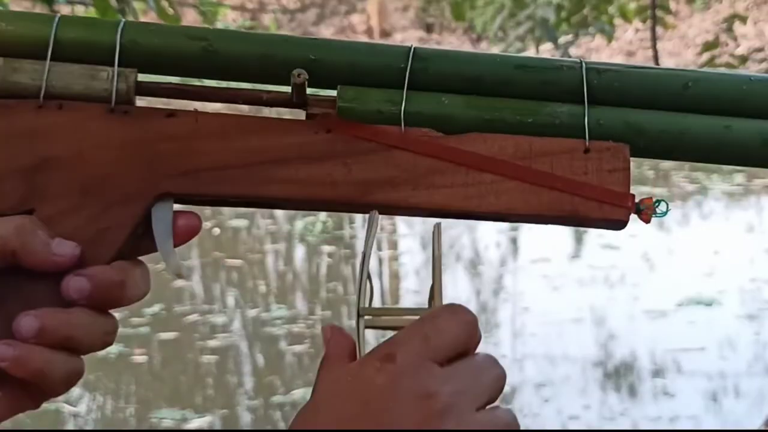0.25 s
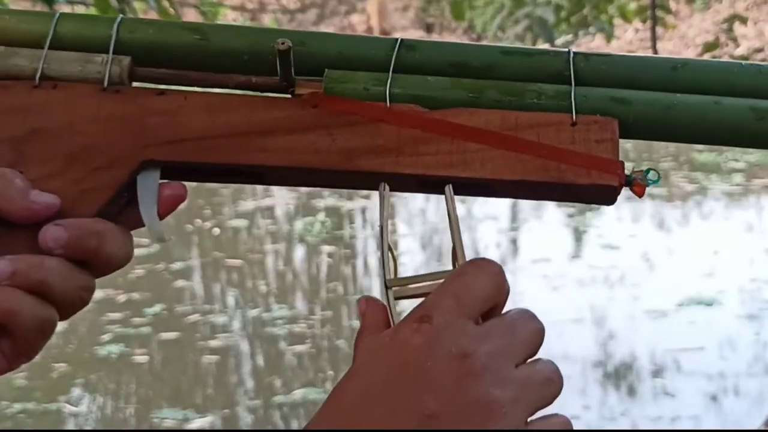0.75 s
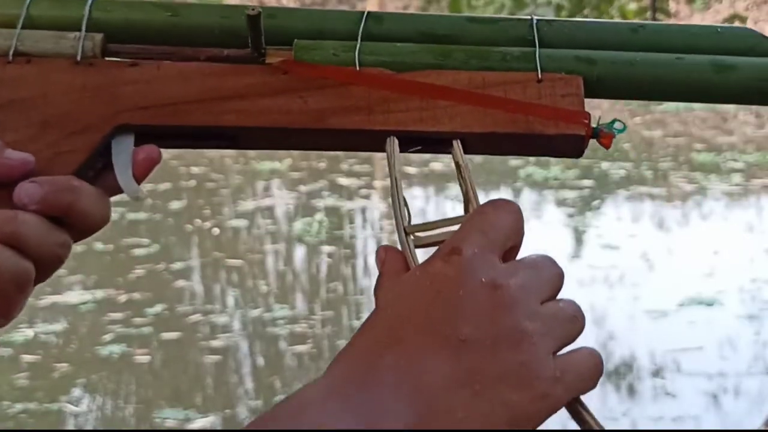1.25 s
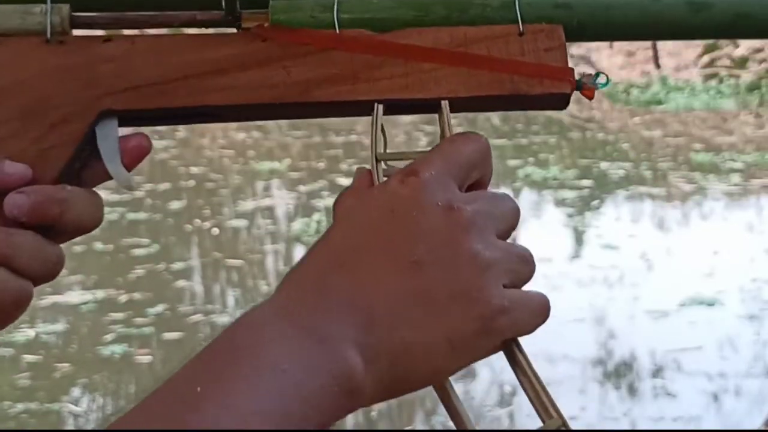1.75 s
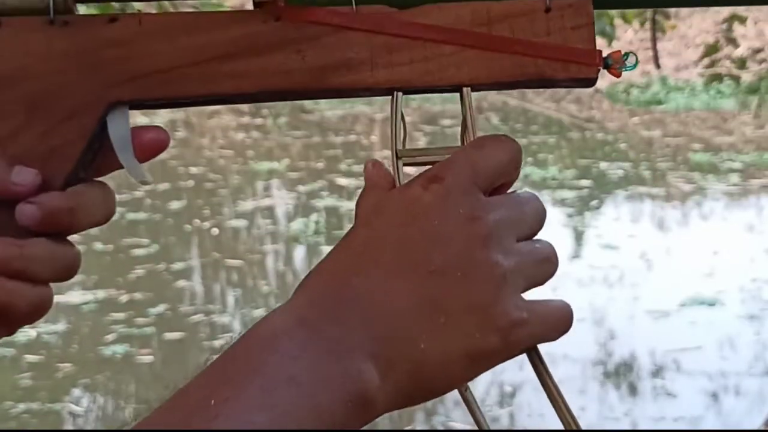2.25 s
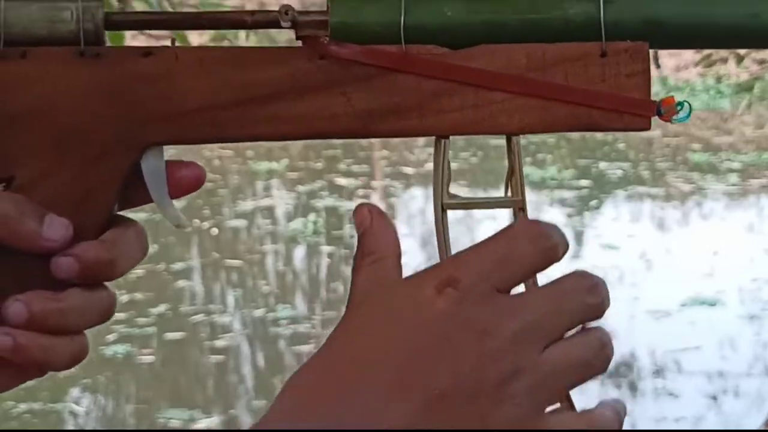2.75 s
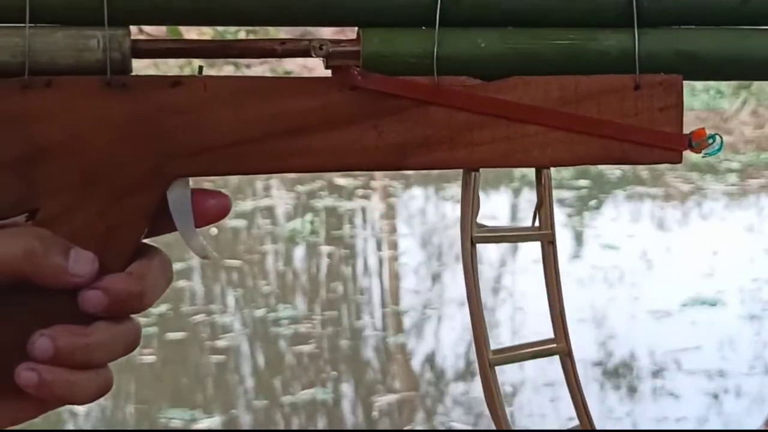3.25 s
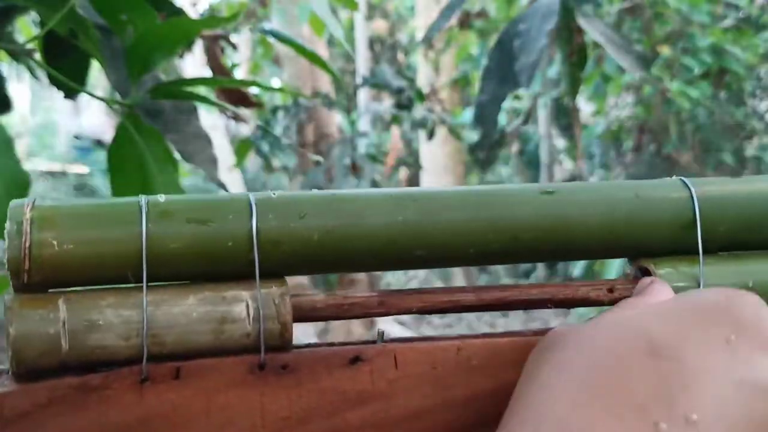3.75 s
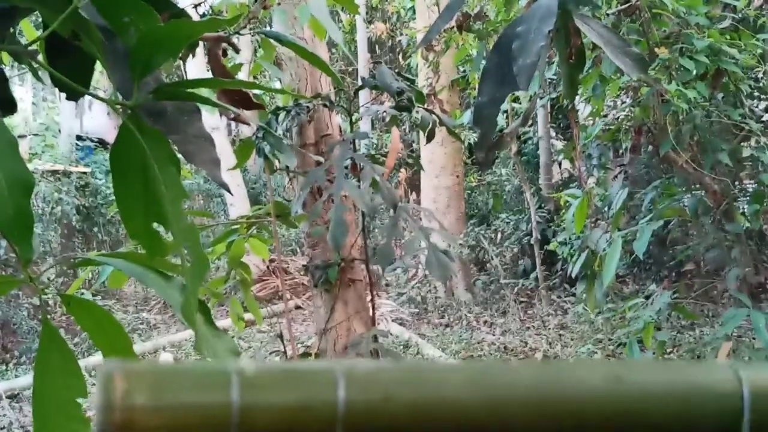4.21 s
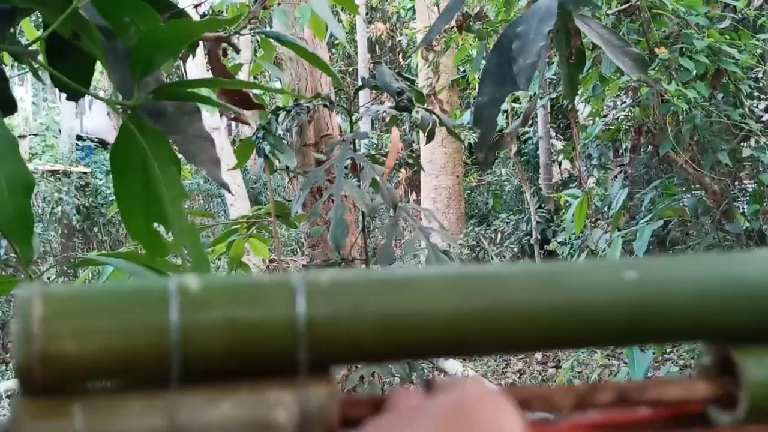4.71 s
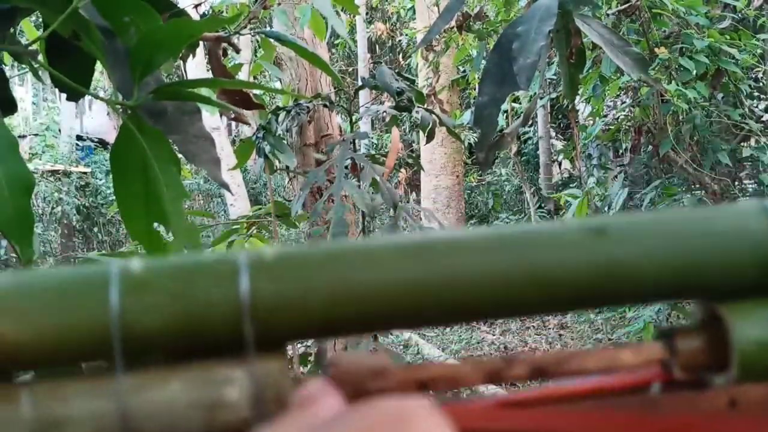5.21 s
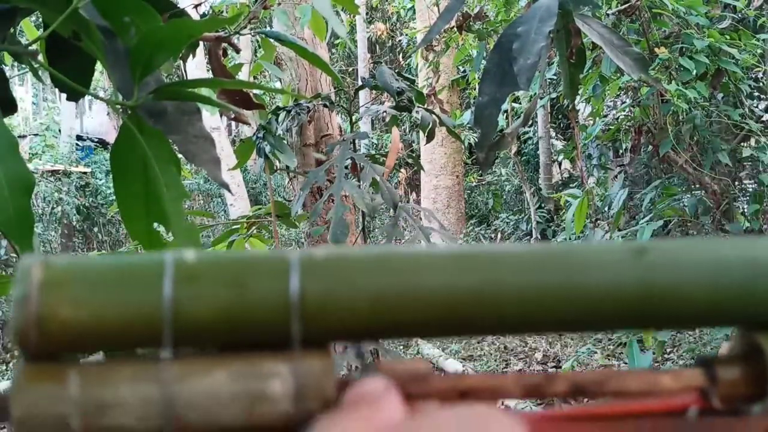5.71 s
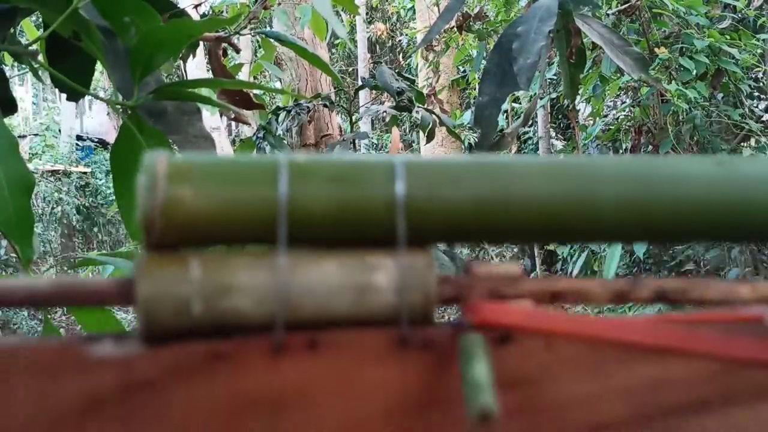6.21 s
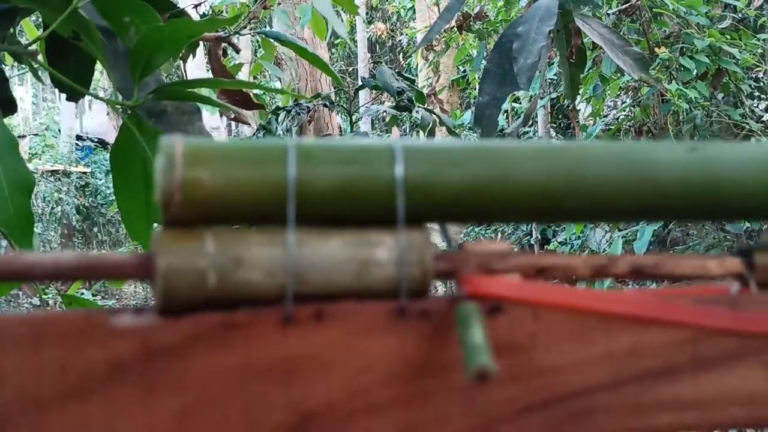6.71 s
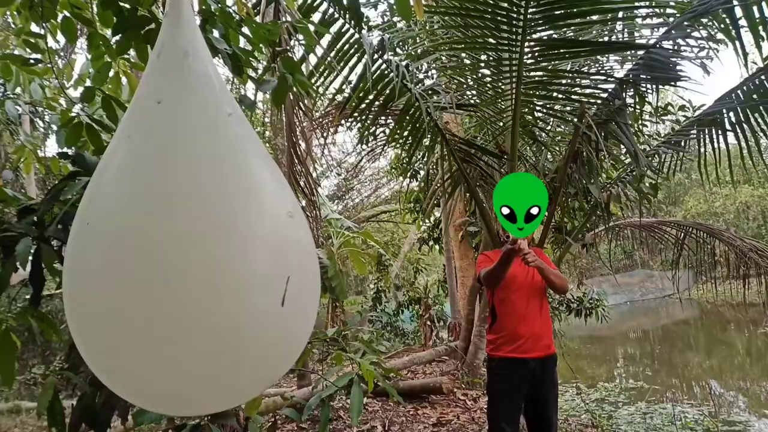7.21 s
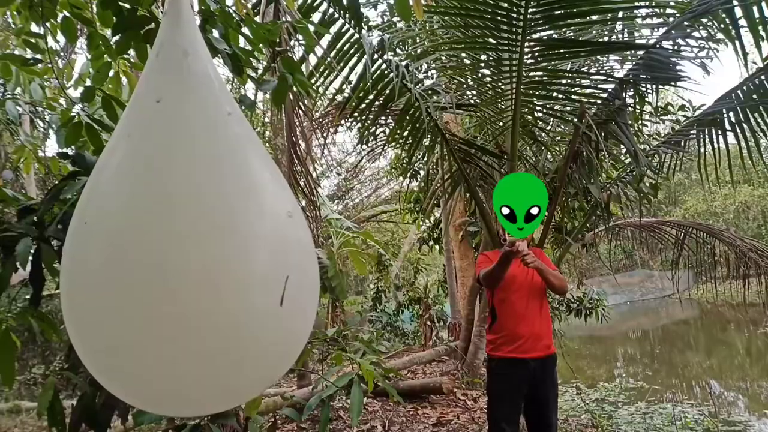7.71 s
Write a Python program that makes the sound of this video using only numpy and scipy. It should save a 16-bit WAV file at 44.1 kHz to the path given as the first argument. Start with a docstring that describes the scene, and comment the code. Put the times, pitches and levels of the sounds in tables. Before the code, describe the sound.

Light cane ticks on wood, then a sudden loud dragging rattle of a bolt in bamboo, a small catch click, insects whining, birds whistling outdoors.

```python
"""Bamboo toy gun in a grove

A cane clip ticks into the stock, then the bolt drags and rattles through the tube and the trigger catches.
Contacts are noise bursts ringing wood and glassy skin; drags are grains of noise; jolts leave decaying sines.
Cicadas whine as patterned clicks and coloured noise; far birds twitter in blurred tones, a near one whistles.
Rumble, a far motor's hum and leaf hiss fill the air, whose layers jump in level; a phone's top cut ends it."""
import sys
import numpy as np
from scipy import signal
from scipy.fft import rfft, irfft
from scipy.io import wavfile
from scipy.ndimage import uniform_filter1d

SR = 44100
rng = np.random.default_rng(int(sys.argv[2]) if len(sys.argv) > 2 else 0)


def inscribe(sig):
    """Save sig as 16-bit PCM at rate SR to the path in sys.argv[1].

    A 1-D sig is mono; a 2-D sig holds one channel per row.
    Samples are clipped to [-1, 1] before scaling.
    """
    pcm = np.round(np.clip(np.atleast_2d(sig).T, -1, 1) * 32767)
    wavfile.write(sys.argv[1], SR, pcm.astype(np.int16))


N = 351036
T = np.arange(N) / SR
CHANGE_S = 7.1  # the rumble changes colour and the murmur of birds ends


def undb(db):
    """Turn decibels into an amplitude factor."""
    return 10 ** (np.asarray(db) / 20)


def unit(x):
    """Scale to rms 1."""
    return x / np.sqrt(np.mean(x ** 2))


def columns(table):
    """Read every column of a curve at every sample."""
    time_s, *rest = np.transpose(table)
    return [np.interp(T, time_s, column) for column in rest]


def colour(x, points):
    """Shape a spectrum by (Hz, dB) points joined along log frequency, then scale to rms 1."""
    hz, db = np.transpose(points)
    f = np.fft.rfftfreq(len(x), 1 / SR) + 1
    gain_db = np.interp(np.log(f), np.log(hz), db, left=-80, right=-80)
    return unit(irfft(rfft(x) * undb(gain_db), len(x)))


def body(x, modes):
    """Ring a set of resonances, neighbours in opposite sign."""
    out = 0
    for k, (hz, width_hz, db) in enumerate(modes):
        resonance = signal.lfilter(*signal.iirpeak(hz, hz / width_hz, SR), x)
        out = out + (-1) ** k * undb(db) * resonance
    return out


def smooth_twice(x, samples):
    """Round off fast movement with two running averages."""
    return uniform_filter1d(uniform_filter1d(x, samples), samples)


def walk(rate):
    """Random wander with rms 1, drawing a new value rate times a second."""
    hold = int(SR / rate)
    steps = np.repeat(rng.standard_normal(N // hold + 1), hold)
    return unit(smooth_twice(steps, hold)[:N])


def add(out, start_s, x):
    """Mix x into out from start_s."""
    i = int(start_s * SR)
    out[i:i + len(x)] += x[:N - i]


def dull(x):
    """Low-pass at 9.5 kHz: wood and wall radiate little above this."""
    return signal.sosfilt(signal.butter(3, 9500, fs=SR, output="sos"), x)


# Spectrum of the low air noise before and after CHANGE_S: pitch_hz, level_db (relative, per Hz)
EARLY_RUMBLE = [(15, -45.5), (25, -18), (43, -8), (102, 1), (188, -4), (220, -6), (249, -8), (340, -5),
                (812, -14), (1110, -22), (1600, -26.5), (2080, -47), (3520, -120)]
LATE_RUMBLE = [(15, -49.5), (25, -29), (75, 4.5), (102, -2), (281, -8), (426, -10), (647, -10), (840, -17),
               (1600, -27.5), (2080, -31.5), (3520, -120)]


def air_rumble():
    """Low noise, its spectrum switching at CHANGE_S."""
    noise = rng.standard_normal(N)
    return np.where(T < CHANGE_S, colour(noise, EARLY_RUMBLE), colour(noise, LATE_RUMBLE))


# Hum of a far motor: start_s (after a fade-in), stop_s, pitch_hz, width_hz, level_db
MOTOR = (.35, 2.35, 342, 16, -63.5)


def far_motor():
    """One narrow noise band hums, easing in and out."""
    start_s, stop_s, hz, width_hz, level_db = MOTOR
    fade = np.interp(T, [start_s - .2, start_s, stop_s - .5, stop_s], [0, 1, 1, 0])
    return undb(level_db) * fade * unit(body(rng.standard_normal(N), [(hz, width_hz, 0)]))


# Spectrum of the leaves: pitch_hz, level_db (relative, per Hz)
LEAVES = [(700, -13), (1300, 0.5), (2200, -3.5), (3000, -1.5), (5000, -4.5), (7500, -7), (10000, -15),
          (12000, -14), (15500, -9.5), (16200, -32)]


def leaf_hiss():
    """Leaves hiss as broad coloured noise."""
    return colour(rng.standard_normal(N), LEAVES)


def cicada(kind, shape, chorus_db):
    """One near singer clicks its tymbal in a repeating pattern; far ones blur to noise of the same colour."""
    rate, pattern_db = kind
    count = np.cumsum(rate * (1 + .002 * walk(6)) / SR).astype(int)
    click_db = np.array(pattern_db)[count % len(pattern_db)] + 1.8 * rng.standard_normal(N)
    clicks = np.diff(count, prepend=0) * undb(click_db)
    chorus = undb(chorus_db) * rng.standard_normal(N)
    return colour(unit(clicks) + chorus, shape) * undb(1.4 * walk(23))


# Tymbal of the low singer: clicks_per_s, then the level_db of each click in one muscle cycle
LOW_TYMBAL = (248, [0, -7])
# Spectrum its body radiates: pitch_hz, level_db (relative, per Hz)
LOW_CICADA_BODY = [(6300, -34), (6900, -13), (7150, -3), (7450, -2), (7700, -5), (8100, -25.5)]


def low_cicadas():
    """Paired clicks under a louder chorus, strongest around 7 kHz."""
    return cicada(LOW_TYMBAL, LOW_CICADA_BODY, chorus_db=4.5)


# Tymbal of the high singer: clicks_per_s, then the level_db of each click in one muscle cycle
HIGH_TYMBAL = (385, [0, -9, -6, -4, -5, -10])
# Spectra of its body and of the far chorus: pitch_hz, level_db (relative, per Hz)
HIGH_CICADA_BODY = [(7400, -38.5), (7900, -9), (8350, 0), (8600, -6), (9050, 0.5), (9280, -7.5),
                    (9400, -19), (9900, -29)]
HIGH_FAR_CHORUS = [(6500, -25), (7800, -8), (8300, 0.5), (8900, -3.5), (9300, -10.5), (9600, -32)]


def high_cicadas():
    """Six-click cycles with a chorus, switching at 2.56 s to the noise of a far chorus alone."""
    switch_s = 2.56
    near = cicada(HIGH_TYMBAL, HIGH_CICADA_BODY, chorus_db=-1)
    far = colour(rng.standard_normal(N), HIGH_FAR_CHORUS)
    return np.where(T < switch_s, near, far)


def shrill_insects():
    """The finest insects make a noise band around 14.8 kHz."""
    shape = [(12000, -19.5), (13400, -4), (14800, 4.5), (15500, 0.5), (15900, -26.5)]  # (Hz, dB)
    return colour(rng.standard_normal(N), shape)


# Mix of the air, in ramps between holds and quick jumps: time_s, rumble_db, leaf_hiss_db,
# low_cicadas_db, high_cicadas_db, shrill_insects_db (before the small level wander)
AIR_MIX = [(0, -55.5, -66, -61.5, -58, -78), (.8, -53.5, -65.5, -58.5, -57.5, -77),
           (2.52, -53, -64, -58.5, -57, -73), (2.62, -57, -67, -61, -73.5, -78),
           (3.55, -56.5, -67, -60.5, -68, -77.5), (3.62, -71, -77, -71.5, -76.5, -88.5),
           (4.8, -67.5, -77.5, -69, -66, -86.5), (4.95, -61, -66.5, -63, -61.5, -79.5),
           (5.43, -63.5, -74, -66, -66.5, -85.5), (5.52, -66, -73.5, -79.5, -67, -90),
           (6.3, -68, -77.5, -80, -71, -91), (7.03, -67.5, -74.5, -74.5, -70.5, -93),
           (7.08, -73, -76.5, -77.5, -76.5, -92), (7.2, -58.5, -64, -72, -75, -93),
           (7.4, -57.5, -66.5, -73.5, -75, -87), (7.65, -53, -61.5, -69, -73.5, -78),
           (7.96, -51.5, -60, -66.5, -72, -80.5)]


def surroundings():
    """Air, leaves and insects follow one mix; the motor keeps its own level."""
    rumble, hiss, low, high, shrill = undb(columns(AIR_MIX))
    air = rumble * undb(walk(21)) * air_rumble() + hiss * undb(walk(12)) * leaf_hiss()
    insects = low * low_cicadas() + high * high_cicadas() + shrill * undb(walk(14)) * shrill_insects()
    return air + far_motor() + insects


def note(length_s, from_hz, to_hz, blur):
    """A gliding tone whose flutter is averaged over blur samples, as leaves and distance smear it."""
    t = T[:int(length_s * SR)]
    flutter = unit(smooth_twice(rng.standard_normal(SR // 2), blur))[:len(t)]
    tone = np.sin(2 * np.pi * (from_hz + (to_hz - from_hz) * t / length_s / 2) * t)
    return np.sqrt(np.sin(np.pi * t / length_s)) * (.5 + .9 * flutter) * tone


# Notes of the far birds: start_s, length_s, pitch_hz (mid-note), glide_hz, level_db (before flutter)
FAR_NOTES = [(.005, 0.073, 2864, 1, -59.5), (0.064, 0.177, 2878, -100, -70), (0.202, .13, 3406, -1, -65.5),
             (0.249, 0.21, 2780, 4, -65.5), (.342, 0.079, 3150, -2, -66.5), (1.696, 0.108, 2487, -3, -59.5),
             (1.83, 0.085, 2402, 0.5, -64), (2.06, 0.118, 2524, -4.5, -61.5),
             (2.819, 0.167, 2902, 0.5, -70.5), (2.82, 0.045, 3220, 0, -70), (3.066, 0.111, 1542, -64, -64),
             (5.041, 0.044, 3060, 0.5, -64), (5.368, 0.0927, 1417, -59, -66.5),
             (5.452, 0.058, 1710, -1, -65), (5.799, 0.181, 3070, 1, -74), (5.763, .06, 3800, 0, -73),
             (6.098, .083, 3731, 200, -74.5), (6.215, 0.082, 3406, 0, -72.5),
             (6.332, 0.1176, 1528, 0.5, -74), (6.768, 0.0676, 3762, 0, -70.5), (6.88, .069, 3190, 400, -66),
             (6.94, .106, 3400, -150, -70), (7.055, 0.032, 3750, -700, -66.5),
             (7.088, 0.0505, 2308, -0.5, -74.5)]
# One falling swish: start_s, length_s, from_hz, to_hz, level_db (before flutter)
FALLING_SWISH = (7.035, .035, 7200, 4000, -73)


def far_birds():
    """Blurred notes, a murmur of unseen birds near 3 kHz, and one falling swish."""
    out = np.zeros(N)
    for start_s, length_s, hz, glide_hz, level_db in FAR_NOTES:
        call = note(length_s, hz - glide_hz / 2, hz + glide_hz / 2, blur=125)
        add(out, start_s, undb(level_db) * call)
    start_s, length_s, from_hz, to_hz, level_db = FALLING_SWISH
    add(out, start_s, undb(level_db) * note(length_s, from_hz, to_hz, blur=50))
    murmur = np.zeros(N)
    for hz in (2800, 3200, 3700):
        band = unit(body(rng.standard_normal(N), [(hz, 300, 0)]))
        murmur += undb(3.63 * walk(14)) * band
    return out + undb(-84.5) * ((T > 5.3) & (T < CHANGE_S)) * murmur


# Resonances of the hollow bamboo, then of its glassy skin: pitch_hz, width_hz, level_db
HOLLOW_TUBE = [(122.6, 110, -7.5), (189.4, 30, -7.5), (278.6, 25, -1.5), (420.6, 34, -7.5),
               (570, 180, -3.5), (948, 210, -4)]
GLASSY_SKIN = [(10414, 720, -2), (11174, 1100, -1), (15770, 3200, 5)]


def contacts(table, wood, spike_t60_s, ring_q, tail_t60_s, boom_db):
    """A spike and noisy tail ring wood, skin and one favoured mode, with a boom of the tube."""
    out, t = np.zeros(N), T[:SR // 6]
    boom = body(undb(-60 * t / 0.0026), HOLLOW_TUBE)
    boom = undb(boom_db) * boom / np.abs(boom).max()
    for start_s, peak_db, hz, ring_db, tilt_db, treble_db, tail_db in table:
        shape = undb(-60 * t / spike_t60_s) + undb(tail_db - 60 * t / tail_t60_s)
        noise = rng.standard_normal((2, len(t)))
        noise[:, 0] = 3.7  # first touch wakes every mode at once
        # harder, smaller contacts favour the upper modes
        modes = [(f, width, db + tilt_db * np.log2(f / 4000)) for f, width, db in wood]
        modes.append((hz, hz / ring_q, ring_db))
        crack = dull(body(shape * noise[0], modes))
        crack += undb(treble_db) * body(shape ** 1.25 * noise[1], GLASSY_SKIN)  # the skin dies sooner
        add(out, start_s, undb(peak_db) * (crack / np.abs(crack).max() + boom))
    return out


# Resonances of the wooden stock: pitch_hz, width_hz, level_db
WOODEN_STOCK = [(1726, 343, -1), (2957, 268, -6), (3400, 310, -17), (3794, 426, -3.5), (4870, 1350, 6.5),
                (5906, 1460, 4), (7570, 1007, 5)]
# Cane ticking on the stock: start_s, peak_db (without boom), ring_hz (favoured mode), ring_db,
# tilt_db (an octave), treble_db (skin), tail_db
CLIP_TICKS = [(.5577, -26.5, 3370, 13, -2, 0.5, -14.5), (.5634, -36, 4200, 8, 1.5, 0, -9.5),
              (.5742, -23, 3690, 6.5, -2.5, 1, -16), (.5835, -33.5, 3240, 7.5, 4.5, -7, -13),
              (.742, -35, 1838, 12.5, -6, 3.5, -14.5), (.8021, -28, 2800, 9, -3, 1.5, -15.5),
              (.852, -43, 2850, 8, -5, -8, -17.5), (.9253, -39.5, 3933, 10.5, -4.5, -5, -3.5),
              (.9465, -41, 1540, 3.5, -5.5, -6, -5), (1.015, -43, 6560, 10.5, 5, -12.5, -13.5),
              (1.3742, -19.5, 2676, -0.5, -2, 1, -13), (1.6855, -22, 6213, 11, 5.5, 5, -4),
              (2.099, -44, 2500, -7.5, 2, -17, -4.5), (3.7983, -56.5, 2720, 9, 1, -12.5, 8),
              (3.868, -55, 7100, -2.5, -1.5, -15.5, -16), (5.7476, -51, 3660, 8, -5, -0.5, -15),
              (6.952, -51, 3382, -2.5, 2, 4.5, -10)]


def clip_ticks():
    """Light cane strikes wood: a very short spike and little boom."""
    return contacts(CLIP_TICKS, WOODEN_STOCK, spike_t60_s=.0055, ring_q=8, tail_t60_s=.08, boom_db=-27)


def scrape(modes, patchy_db, rate):
    """Stick and slip: uneven grains; the wandering contact wakes now one resonance, now another."""
    out = 0
    for mode in modes:
        size_db = np.minimum(1.4 * rng.exponential(size=N), 12) + patchy_db * walk(rate)
        slips = rng.random(N) < .15
        grains = rng.standard_normal(N) * slips * undb(size_db)
        out = out + body(grains, [mode])
    return unit(out)


# Resonances of the hard bamboo wall: pitch_hz, width_hz, level_db
HARD_WALL = [(1674, 370, -2), (3011, 650, -0.5), (4300, 1400, -2), (5200, 1900, -4.5), (7760, 650, -1)]
# Bolt sliding, one table a drag: time_s, scrape_db, then relative to it hollow_db (tube), treble_db (skin)
BOLT_DRAGS = [
    [(4.11, -91.5, -13.5, -13.5), (4.132, -50, -1.5, -8), (4.17, -47.5, -23, -12), (4.182, -61.5, -4, -6.5),
     (4.22, -65.5, -1, -1.5), (4.24, -44.5, -10.5, -30.5), (4.255, -55, -12, -6), (4.278, -51.5, 8, -12),
     (4.298, -50.5, 14, -30)],
    [(4.302, -34.5, 3.5, -28), (4.32, -24.5, -3.5, -25), (4.366, -29, 3, -19), (4.39, -47, 2.5, -11),
     (4.403, -25.5, 5.5, -8), (4.443, -26, -4.5, -21), (4.482, -26, -4.5, -6), (4.5, -29.5, -3, -19),
     (4.53, -41, 4.5, -24), (4.572, -39.5, 1.5, -36), (4.62, -47, 9, -31), (4.65, -28, -10.5, -20.5),
     (4.662, -45, 1, -2.5), (4.69, -53, 8.5, -24), (4.73, -50.5, 9, -7.5), (4.8, -71, 17, -15.5),
     (4.87, -91, 13.5, -19.5)],
    [(4.88, -64.5, -7, -19.5), (4.928, -58, -5, -10.5), (4.946, -46, -11, -11.5), (5.03, -69, 4.5, -19)],
]


def bolt_slide():
    """The bolt scrapes along the wall, the skin and the hollow of the tube."""
    scrape_db, hollow_db, treble_db = columns(np.concatenate(BOLT_DRAGS))
    moving = (T > BOLT_DRAGS[0][0][0]) & (T < BOLT_DRAGS[-1][-1][0])
    wall = dull(scrape(HARD_WALL, patchy_db=4.5, rate=150))
    skin = scrape(GLASSY_SKIN, patchy_db=3.5, rate=98)
    low_hollow = scrape(HOLLOW_TUBE[:3], patchy_db=6.0, rate=33)
    overtones = undb(-2) * scrape(HOLLOW_TUBE[3:], patchy_db=2.5, rate=55)
    texture = wall + undb(treble_db) * skin + undb(hollow_db) * (low_hollow + overtones)
    return uniform_filter1d(moving * undb(scrape_db), 90) * texture


# Bolt knocking in the tube: start_s, peak_db (without boom), ring_hz (favoured mode), ring_db,
# tilt_db (an octave), treble_db (skin), tail_db
BOLT_KNOCKS = [(4.125, -44.5, 7300, 12, 1, -2.5, -7.5), (4.1352, -32.5, 1880, 15.5, 5, -7.5, -12.5),
               (4.165, -33.5, 4880, 18.5, 1.5, -4.5, -2.5), (4.1947, -39.5, 1475, 11.5, -8.5, -12, -3),
               (4.2367, -29, 2717, 8, -6, -15.5, -8.5), (4.3079, -17, 7460, 5, 6.5, -7.5, -10),
               (4.3141, -16, 7800, 10, -2, -5.5, -5.5), (4.3203, -6, 6965, 10, 4.5, -8.5, -9),
               (4.3366, -10, 6730, 5, 1, -11.5, -7), (4.3596, -12, 6780, 11, -2, -10, -8),
               (4.3994, -13, 3405, 12, 1.5, -6, -8.5), (4.4128, -8.5, 4400, 8, 8, -9, -9),
               (4.4164, -11, 3551, 11, 2, -9, -9.5), (4.4348, -3, 7180, 11, 1.7, -17, -7.5),
               (4.4433, -9.5, 7390, 11, 5.5, -5.5, -8), (4.4628, -6.5, 4350, 8, 5.5, -7.5, -7.5),
               (4.4771, -5, 7987, 17, 2.44, -8, -9.5), (4.4849, -10.5, 7391, 12, -1.76, -19, -7),
               (4.5007, -21, 4750, 11, -2.82, -9, -7.5), (4.536, -23, 1677, 10.5, 0.5, -23.5, -12),
               (4.55, -21, 3750, 14.5, 5, -30, -15.5), (4.586, -27.5, 2930, 5.5, -4, -28.5, -2),
               (4.6301, -23.5, 2735, 9.5, -6.5, -22, 2), (4.6479, -17, 1900, 5.5, -3, -16.5, -12),
               (4.729, -33, 1579, 12, -6.5, -19, -4), (4.7671, -35, 3500, 8.5, 0.9, -13.5, -4),
               (4.894, -43.5, 4980, 4, -0.78, -15.5, -2.5), (4.9418, -33.5, 7300, 9.5, 7, -9.5, -5.5),
               (4.9653, -34, 5120, 10, -1.76, -8, 1), (4.9842, -37.5, 3055, 15, -3.5, -14, -19),
               (5.0043, -40, 5010, 8.5, 2, -13, -9)]


def bolt_knocks():
    """The bolt strikes the wall: a longer spike, a sharper ring and a strong boom."""
    return contacts(BOLT_KNOCKS, HARD_WALL, spike_t60_s=.0195, ring_q=16, tail_t60_s=.0371, boom_db=-12.5)


def ring(level_db, hz, t60_s):
    """One decaying mode, eased in over 3 ms."""
    t = T[:int(t60_s * SR)]
    wake = np.sin(np.pi / 2 * np.minimum(t / .003, 1)) ** 2
    return undb(level_db - 60 * t / t60_s) * np.sin(2 * np.pi * hz * t) * wake


# What rings on after a jolt, by part: pitch_hz, t60_s
RINGING_PARTS = {"tube": (289.1, .16), "overtone": (590, 0.092), "grip": (125, 0.1), "stock": (180, .12),
                 "hand": (65, .13), "long wire": (3710, .42), "catch": (3075, .018),
                 "catch plate": (2709, .02), "knot": (3760, 0.043), "wire": (4330, .15),
                 "short wire": (7956, .03), "short wire, free end": (7860, .27), "pin": (10170, 0.065),
                 "twist": (12150, .08)}
# Jolts: start_s, level_db (at the start of the decay), part
GUN_JOLTS = [(4.303, -19, "tube"), (4.305, -26, "stock"), (4.312, -28, "pin"), (4.322, -34, "twist"),
             (4.339, -32.5, "twist"), (4.34, -27, "stock"), (4.32, -27, "overtone"),
             (4.36, -26, "overtone"), (4.398, -14.5, "tube"), (4.399, -21, "overtone"),
             (4.432, -22, "tube"), (4.435, -38, "pin"), (4.445, -25, "stock"), (4.45, -21, "overtone"),
             (4.462, -24.5, "wire"), (4.473, -18.5, "grip"), (4.556, -30, "tube"),
             (4.564, -13, "short wire"), (4.575, -46, "short wire, free end"), (4.48, -28.5, "hand"),
             (5.1464, -28, "catch"), (5.146, -33.5, "catch plate"), (5.298, -37, "catch plate"),
             (5.297, -41, "catch"), (4.652, -45, "long wire"), (4.699, -36, "knot"), (4.551, -32, "knot")]


def jolted_parts():
    """Jolts leave thin rings and low thumps, each a single decaying mode."""
    out = np.zeros(N)
    for start_s, level_db, part in GUN_JOLTS:
        add(out, start_s, ring(level_db, *RINGING_PARTS[part]))
    return out


# Trigger catching: start_s, peak_db (without boom), ring_hz (favoured mode), ring_db,
# tilt_db (an octave), treble_db (skin), tail_db
TRIGGER_CATCHES = [(5.1475, -36, 6000, 3.5, 2.4, -11, -15), (5.2991, -46, 4800, 3, -2.5, -11.5, -16.5)]


def trigger_catches():
    """The trigger catches against the stock: a short spike and a quick tail."""
    return contacts(TRIGGER_CATCHES, WOODEN_STOCK, spike_t60_s=.008, ring_q=8.5, tail_t60_s=.035, boom_db=-21)


# Whistles of the near bird: start_s, length_s, pitch_hz, scoop_s (slide up), step_hz, sag_hz,
# start_db, end_db, octave_db (relative to the whistle), flick_db
NEAR_WHISTLES = [(7.359, .09, 6150, 0.00564, 221, 800, -55, -54, -18, -74.5),
                 (7.614, .08, 5843, 0.01758, 32.5, 160, -42, -31, -25, -41.5),
                 (7.828, .077, 5803, 0.01115, 31.5, 90.5, -51.5, -36.5, -13.5, -43),
                 (7.939, 0.092, 5850, 0.0039, 0, 99.5, -52.5, -35.5, -29.5, -75)]


def near_bird():
    """Whistles with a weak octave and falling flicks, trailed by echoes from the trunks."""
    scoop_hz = 328  # how far below pitch each whistle begins
    break_at, break_s, break_db = 0.531, 0.00305, -17.5  # catch in the voice (share of length, s, dB)
    flick_s, flick_hz = .0105, 1000  # length and fall of the closing flick
    grove_t60_s, grove_db = 0.67, -6.5
    dry = np.zeros(N)
    for start_s, length_s, hz, scoop_s, step_hz, sag_hz, start_db, end_db, octave_db, flick_db in NEAR_WHISTLES:
        t = T[:int(length_s * SR)]
        u = t / length_s
        scoop = scoop_hz * np.exp(-(t / scoop_s) ** 4)
        sag = sag_hz * ((u - break_at) / (1 - break_at)) ** 2
        pitch = hz - scoop + (u > break_at) * (step_hz - sag)
        dip_db = break_db * np.exp(-((t - break_at * length_s) / break_s) ** 2)
        level_db = start_db + (end_db - start_db) * np.sqrt(u) + dip_db
        phase = 2 * np.pi * np.cumsum(pitch) / SR
        edges = np.clip(np.minimum(t, length_s - t) / 0.002, 0, 1)
        voice = np.sin(phase) + undb(octave_db) * np.sin(2 * phase)
        add(dry, start_s, edges * undb(level_db) * voice)
        t = T[:int(flick_s * SR)]
        fall = np.sin(2 * np.pi * (hz - flick_hz * t / flick_s / 2) * t)
        flick = np.sin(np.pi * t / flick_s) * fall
        add(dry, min(start_s + length_s - flick_s / 2, T[-1]), undb(flick_db) * flick)
    echo = rng.standard_normal(SR) * undb(-60 * T[:SR] / grove_t60_s)
    return dry + undb(grove_db) * signal.fftconvolve(dry, echo / np.linalg.norm(echo))[:N]


def scene():
    """All sources at one microphone; the light gun radiates little deep bass."""
    gun = clip_ticks() + bolt_slide() + bolt_knocks() + jolted_parts() + trigger_catches()
    gun = signal.sosfilt(signal.butter(2, 80, "high", fs=SR, output="sos"), gun)
    return (surroundings() + far_birds() + gun + near_bird())[None]


def record(dry):
    """The phone rounds the loudest peaks, drops steeply above 15.6 kHz and cuts the top at 16.6 kHz."""
    rounded = np.tanh(dry)
    soft = signal.sosfilt(signal.ellip(6, .3, 35, 15600, fs=SR, output="sos"), rounded)
    return signal.sosfilt(signal.ellip(8, .2, 70, 16600, fs=SR, output="sos"), soft)


dry = scene()
out = record(dry)
inscribe(out)
```